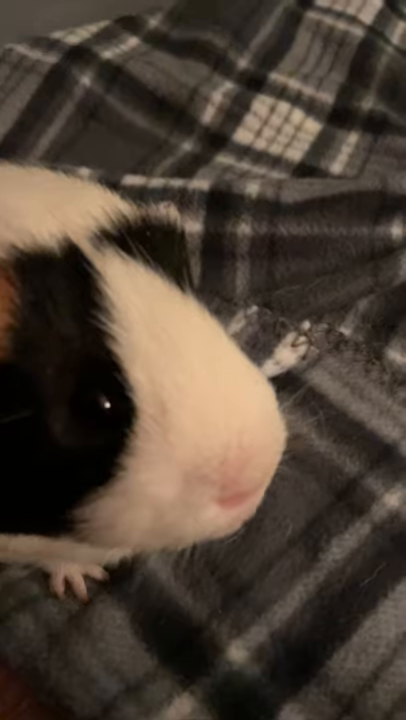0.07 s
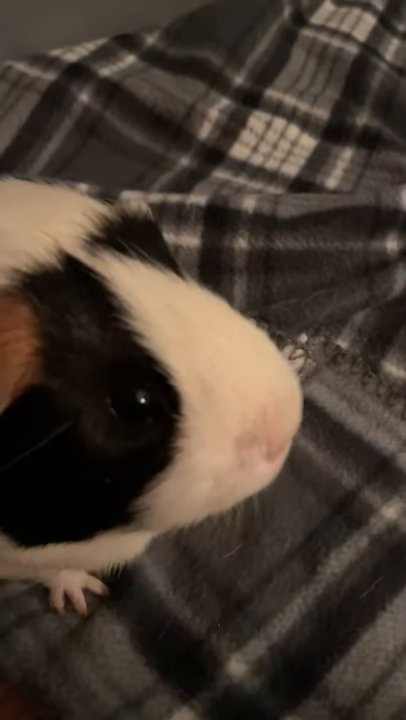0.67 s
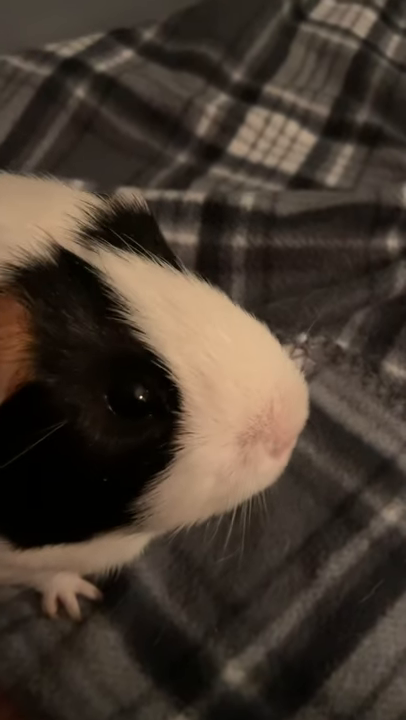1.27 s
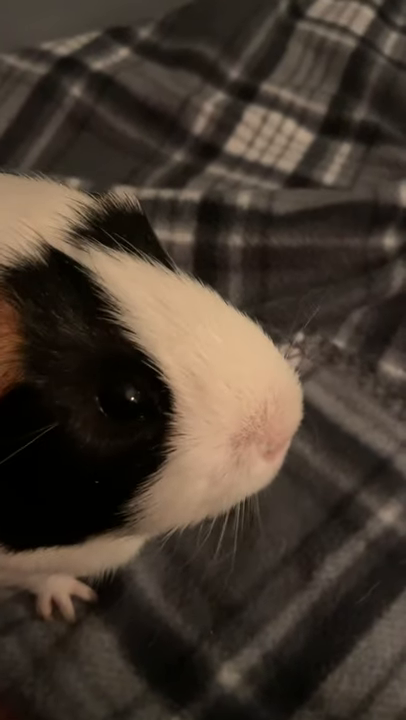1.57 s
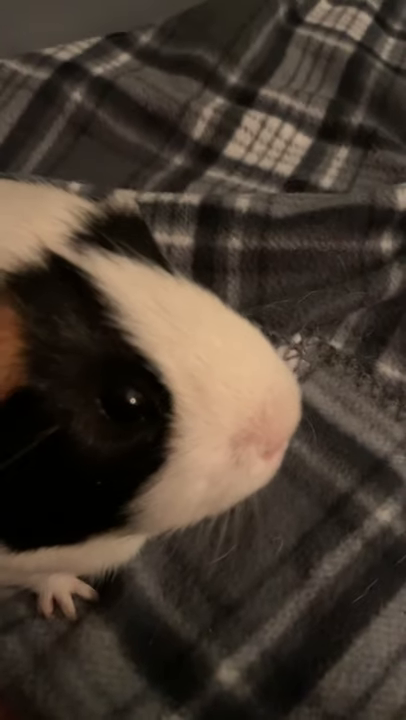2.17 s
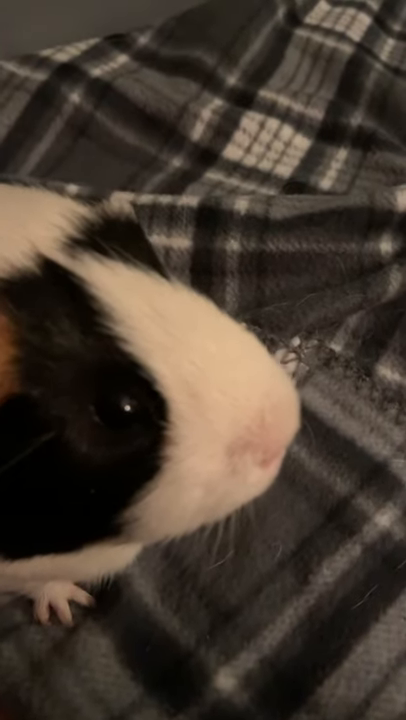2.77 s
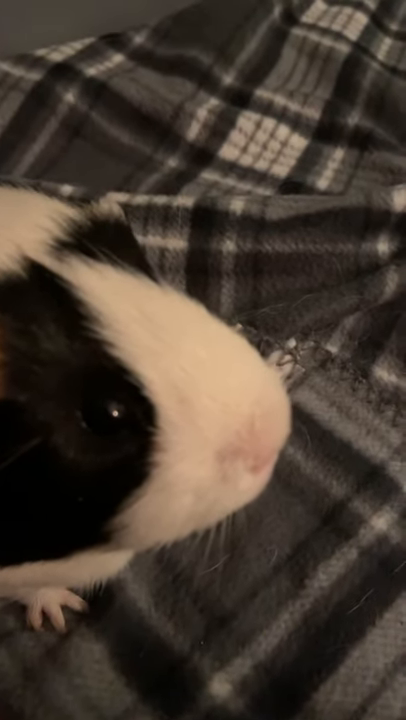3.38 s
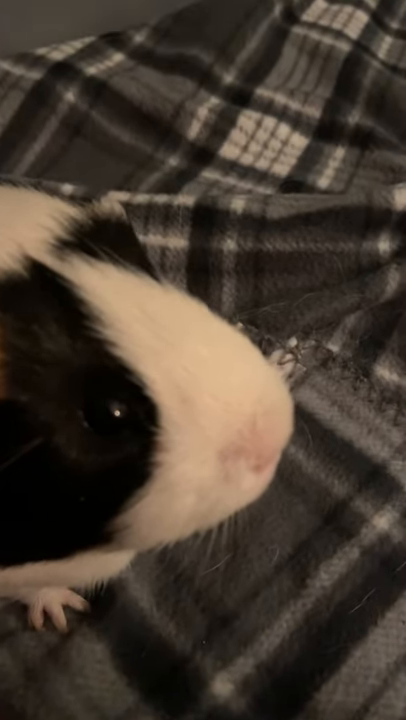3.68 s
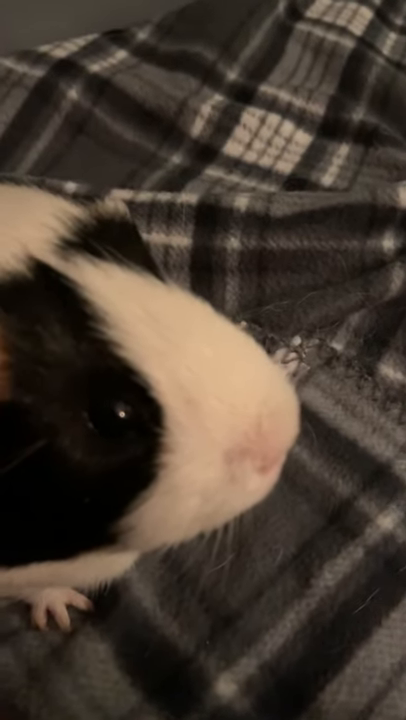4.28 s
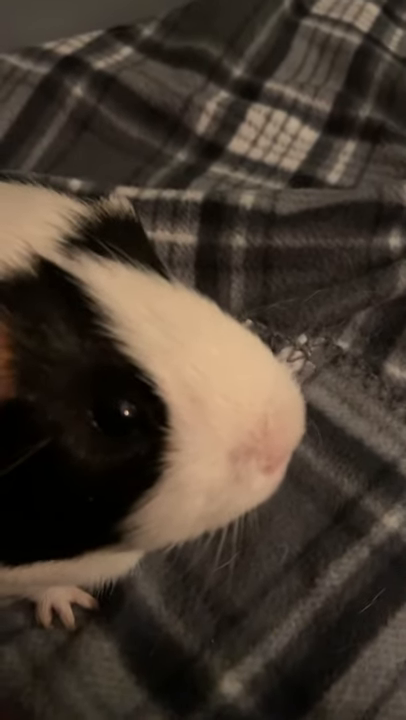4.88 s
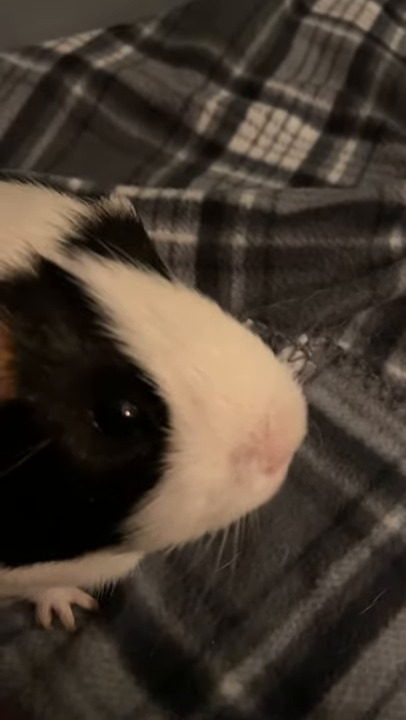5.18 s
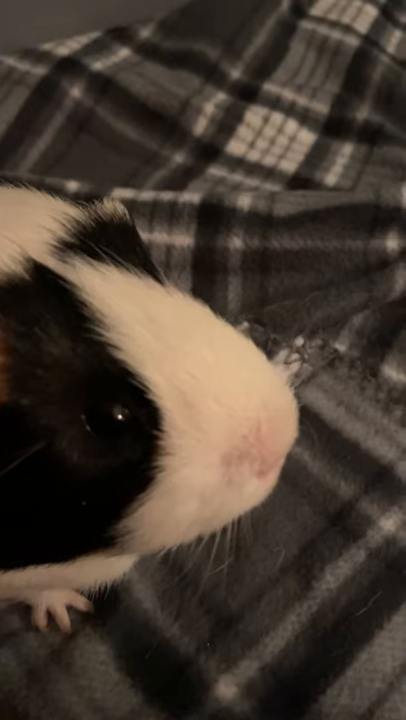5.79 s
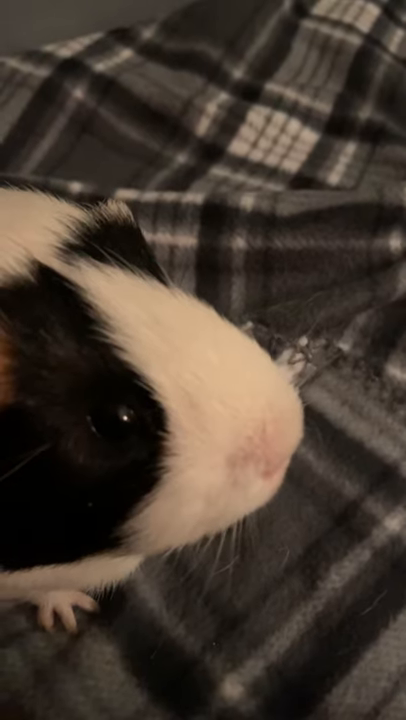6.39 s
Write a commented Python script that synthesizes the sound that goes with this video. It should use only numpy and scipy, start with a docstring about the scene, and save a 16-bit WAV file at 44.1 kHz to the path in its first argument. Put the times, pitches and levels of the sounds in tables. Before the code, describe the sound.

In a quiet indoor room with a low electrical hum and faint hiss, a guinea pig clucks softly right by the microphone. Its very short, creaky chirps come in quick pairs for about three seconds, thin out to a single call for a second, then resume, ending at their brightest and loudest. Now and then its fleece blanket shifts with a soft bump or a light scratchy rustle.

```python
"""A guinea pig makes quick "chut" calls, mostly in pairs, close to a small two-port microphone.
Each chut starts as a low, fluttering creak of the vocal folds, then breaks into a short, clean note
that arches in pitch. The throat and snout colour both parts.
Its fleece blanket gives a few soft bumps and rustles. Behind it all is a quiet room,
with mains hum, a low rumble and faint hiss."""
import sys
import numpy as np
from scipy import signal
from scipy.fft import rfft, irfft
from scipy.io import wavfile
from scipy.ndimage import uniform_filter1d

SR = 44100
rng = np.random.default_rng(int(sys.argv[2]) if len(sys.argv) > 2 else 0)


def file_out(sig):
    """Save sig as 16-bit WAV at sys.argv[1]."""
    # one column per channel
    cols = np.atleast_2d(sig).T
    # limit, then scale
    lim = np.clip(cols, -1, 1)
    pcm = np.round(lim * 32767).astype(np.int16)
    wavfile.write(sys.argv[1], SR, pcm)


N = 284445

# The calls. Each row: start in seconds, creak level in dB, flutter depth (0 none, 1 full), bursts per
# second, note start and length in seconds, the note's start, middle and end pitch in Hz, note level in dB.
CHUT_CALLS = [(0.073, -53.5, 0.73, 110, .1, 0.027, 700, 832, 890, -50),
              (0.151, -53, 0.7, 95, .174, 0.012, 760, 940, 840, -52.5),
              (0.344, -53.5, 0.31, 61, .363, 0.026, 497, 768, 960, -48),
              (0.565, -47, 0.65, 135, .603, .019, 560, 910, 850, -42),
              (0.806, -52, 1, 60, .822, 0.028, 610, 756, 750, -50.5),
              (1.003, -46.5, 1, 130, 1.025, 0.027, 830, 873, 855, -44),
              (1.081, -50, 0.56, 95, 1.104, 0.022, 580, 810.5, 720, -50.5),
              (1.247, -49, 0.75, 133, 1.294, 0.024, 900, 1035, 945, -42.5),
              (1.343, -48, 0.5, 130, 1.372, 0.028, 566, 730, 760, -50.5),
              (1.517, -49.5, 0.84, 110, 1.569, 0.016, 974.5, 1177, 1140, -41.5),
              (1.612, -47.5, 1.05, 101, 1.645, .016, 749.6, 872, 835, -46.5),
              (1.771, -46, 1.18, 123, 1.8245, 0.02, 1024, 1272, 1019, -38.5),
              (1.862, -45, .75, 144, 1.895, .02, 770, 898, 826, -42),
              (2.023, -45, 1.04, 122, 2.079, 0.024, 950, 1225, 907, -38.5),
              (2.118, -45, 0.96, 120, 2.159, 0.027, 786, 1072, 939, -39.5),
              (2.339, -50, 0.92, 104, 2.392, 0.015, 1040, 1270, 1227, -40.5),
              (2.431, -48, .95, 102, 2.4715, .022, 840, 1062, 975, -41.5),
              (2.639, -49.5, 0.88, 114, 2.6895, 0.014, 1019, 1222, 1371, -39.5),
              (2.731, -49, 0.97, 113, 2.7725, 0.026, 800, 1076, 1000, -41.5),
              (3.233, -50.5, 0.42, 134, 3.268, .023, 637, 920, 1008, -46.5),
              (3.978, -50, 0.03, 130, 4.002, .015, 690, 822, 824, -47.5),
              (4.049, -57, 0.16, 138, 4.067, 0.021, 393, 560, 536, -49.5),
              (4.238, -48.5, 0.29, 140, 4.2795, .02, 755, 896, 774, -47.5),
              (4.331, -49, 0.75, 135, 4.351, .014, 503.3, 624, 620, -47),
              (4.476, -46, 0.78, 143, 4.521, 0.017, 580, 903, 790, -44.5),
              (4.585, -52.5, 0.62, 120, 4.604, .017, 419.4, 589, 700, -47.5),
              (4.789, -48.5, 0.37, 140, 4.83, 0.01966, 656, 1051, 1161, -46.5),
              (4.883, -48, .55, 166, 4.9065, 0.029, 705, 805, 1040, -49.5),
              (5.066, -48.5, 0.83, 102, 5.116, .013, 1033, 1206, 1349, -39),
              (5.157, -46, 0.78, 125, 5.19, 0.022, 670, 1038, 1108, -40.5),
              (5.242, -47.5, 0.04, 118, 5.254, 0.017, 525, 677, 614, -47.5),
              (5.382, -48.5, 1, 81.6, 5.4295, 0.017, 923, 1247, 1437, -38.5),
              (5.474, -47, 0.96, 130, 5.5075, 0.027, 793, 1071, 950, -41),
              (5.658, -44.5, 0.78, 135, 5.717, 0.019, 1229, 1403, 1060, -37),
              (5.753, -45, 0.96, 86, 5.801, .016, 990, 1043, 980, -39.5),
              (5.93, -45.5, 0.88, 111, 5.987, 0.018, 1160, 1290, 845, -38.5),
              (6.019, -45.5, 0.87, 105, 6.0714, 0.021, 930, 1096, 940, -37),
              (6.202, -46.5, 0.84, 127, 6.2625, 0.027, 1186, 1362, 770, -35.5),
              (6.2948, -44.5, 0.83, 133, 6.3455, 0.025, 924, 1255, 840, -36.5)]
# Lone clucks of the vocal folds. Each row: start in seconds, level in dB.
LONE_CLUCKS = [(.101, -46), (.366, -45.5), (4.854, -42)]
# How the throat and snout colour the voice. Each row: frequency in Hz, boost in dB.
THROAT_COLOUR = [(120, -35), (260, -10.5), (490, 3), (680, -0.5), (1050, 3), (1300, 6), (1550, 2),
                 (1750, -8.5), (1930, -19), (2200, -8.5), (2450, -9), (2720, -8.5), (3100, -17),
                 (3550, -34.5), (4300, -38.5), (7000, -62)]
# Bumps and rustles of the blanket. Each row: start in seconds, level in dB, centre frequency in Hz,
# width in octaves, seconds to rise, seconds to fade by 60 dB.
BLANKET_MOVES = [(0.099, -69.5, 3580, 0.22, 0.0065, 2), (0.307, -43, 170, 0.11, 0.019, 0.12),
                 (1.247, -68, 3430, 0.24, 0.014, 0.67), (1.622, -71, 3800, 0.2, 0.039, 1.3),
                 (0.68, -88, 11400, 0.14, 0.055, 0.99), (1.33, -83, 7820, 0.15, 0.036, 0.53),
                 (1.58, -78, 11620, 0.08, 0.08, 0.46), (0.43, -77, 3480, 0.23, 0.04, 0.8),
                 (0.86, -72.5, 3500, 0.27, 0.05, 1.1), (3.37, -56.5, 2650, 0.34, 0.013, 0.26),
                 (3.372, -73, 5000, 0.57, 0.004, 0.08), (3.78, -71.5, 1910, 0.65, 0.018, 1.7),
                 (4.918, -42.5, 157, 0.11, 0.017, 0.16), (5.101, -75, 3838, 0.16, 0.028, 1.88),
                 (5.645, -50, 190, 0.72, 0.014, 0.84)]
# Timing of a near sound at the two ports. Each row: frequency in Hz, left's lead in radians.
LEFT_LEAD = [(300, 0), (430, -.3), (630, -2), (800, -1.4), (1350, -1.9), (1540, -2.9), (1650, -5.1),
             (1800, -6.4), (1950, -8.2), (2400, -9.1), (2750, -10), (3400, -10.2)]
# Balance of a near sound at the two ports. Each row: frequency in Hz, left minus right in dB.
LEFT_BOOST = [(180, 0), (280, 2.5), (600, -1), (700, 2.5), (850, -.6), (1400, .3), (1600, -5), (1780, 0),
              (2170, -6), (2350, -3), (2700, -6.5), (3150, 0)]
# Overtones of the mains hum. Each row: frequency in Hz, level in dB.
HUM_OVERTONES = [(119.95, -53.5), (239.9, -67.5), (359.8, -74.5)]
# Overall shape of the rumble and hiss. Each row: frequency in Hz, relative level in dB.
NOISE_COLOUR = [(20, -65), (32, -50), (45, -4.5), (75, -9), (125, -2), (200, -3), (300, -7), (470, -13.5),
                (640, -14.5), (850, -15), (1500, -24.5), (3000, -33), (4000, -38), (4800, -53.5),
                (5700, -36.5), (7400, -36.5), (9000, -52.5), (11000, -39), (13000, -48.5), (15700, -41.5)]
# Hollow resonances of the room. Each row: frequency in Hz, width in Hz, boost in dB.
ROOM_RESONANCES = [(43.8, 15, 14), (93.5, 20, 5.5), (149.4, 22.6, 7), (181.6, 8.9, 7), (2017, 190, 5),
                   (2293, 130, 6)]
# How alike the noise is at the two ports. Each row: frequency in Hz, likeness (-1 opposite, 1 the same).
NOISE_LIKENESS = [(100, .99), (180, .85), (270, .65), (450, .1), (700, -.7), (1250, -.7), (1900, -.25),
                  (3300, -.25), (6000, 0), (9000, .1), (15000, .08)]
# Slow drift of the noise. Each row: time in seconds, middle band and upper band in dB.
# Only a share of each band's swing around its usual level is used.
NOISE_DRIFT = [(0.06, -50, -68), (0.5, -64, -74.5), (0.92, -58, -72), (1.2, -61, -72.5), (1.45, -56, -72),
               (1.72, -47, -67.5), (2.05, -60, -76), (2.3, -65, -77.5), (2.6, -68, -74.5),
               (2.87, -101, -82), (3.3, -77, -78.5), (3.7, -85.5, -81), (4.17, -71, -80),
               (4.52, -61.5, -81), (4.86, -72.5, -82), (5.32, -57.5, -73), (5.66, -70, -75),
               (5.88, -59, -77.5), (6.21, -61, -79.5), (6.3, -56, -67), (6.44, -70, -79)]
# The treble hiss sinks a little. Each row: time in seconds, relative level in dB.
TREBLE_SINK = [(0, -2.5), (1.8, -3.5), (3.6, -4.5), (6.45, -5)]
# The moving edge below which the sound is mono. Each row: time in seconds, frequency in Hz.
MONO_BELOW = [(0, 910), (1.3, 850), (1.95, 500), (2.4, 252), (3.6, 154.8), (4.7, 155), (5.3, 281.5),
              (6.45, 308)]


def guinea_pig(pause_s=.0035, pair_gap_s=.04, cluck_hz=560, cluck_s=.0013):
    """Each chut is a creak and then a note through the same throat; a cluck is one lone burst."""
    voice, last_end = np.zeros(N), 0
    for s, creak_db, depth, rate, note_s, length, start_hz, middle_hz, end_hz, note_db in CHUT_CALLS:
        throat = open_throat(note_db, usual_db=-52, opening=.86)
        # The folds pause as they switch from creak to note, longer after a deep flutter.
        creak_length = max(note_s - s - pause_s * depth, .004)
        # The second chut of a pair starts with the breath already pushing, so it swells less.
        second_of_pair = s - last_end < pair_gap_s
        swell_db = 5.5 - 5 * depth * second_of_pair
        add(voice, s, gain_of(creak_db) * creak(creak_length, rate, depth, throat, swell_db))
        add(voice, note_s, gain_of(note_db) * note(length, start_hz, middle_hz, end_hz, throat))
        add(voice, note_s, breath(length, note_db))
        last_end = note_s + length
    for s, level_db in LONE_CLUCKS:
        cluck = burst(cluck_hz, open_throat(level_db, usual_db=-44))
        add(voice, s, gain_of(level_db) * np.sqrt(cluck_s * SR) * cluck)
    return voice


def creak(length, rate, depth, throat, swell_db, from_hz=440, to_hz=660, jitter=.08, uneven_db=1.1):
    """A low, rising buzz that a slower flutter breaks into bursts; it brightens as it swells."""
    size, depth = int(length * SR), np.clip(depth, 0, 1)
    progress = np.linspace(0, 1, size)
    # Deeper flutter makes the buzz lower, rougher and breathier.
    hz = from_hz * (to_hz / from_hz) ** progress * np.exp(-.1286 * depth)
    wobble = np.exp((.04 + .183 * depth) * wavering(size, smooth=50))
    air = .29 * depth * wavering(size, smooth=5)
    swell = gain_of(swell_db * progress)
    bright_db = 1.06 * swell_db * (progress - .5)
    buzz = unit_level(vocal_folds(hz * wobble, slope_db=bright_db - 4))
    steady = signal.fftconvolve(signal.windows.tukey(size, .3) * swell * (buzz + air), throat)
    bursts = np.zeros(len(steady))
    for start, (late, loud) in zip(np.arange(0, length - .003, 1 / rate), rng.standard_normal((16, 2))):
        at = int(start * SR)
        flap = swell[at] * gain_of(uneven_db * loud) * burst(hz[at], throat, bright_db[at])
        add(bursts, start + jitter * late * min(start, 1 / rate), flap)
    sound = (1 - depth) * unit_level(steady) + depth * unit_level(bursts)
    return sound * np.sqrt(size / np.sum(sound ** 2))


def burst(hz, throat, bright_db=0, length=.0059, rough=.19, airflow=.25):
    """One flap of the slack folds: a few uneven pulses and a puff of air."""
    size = int(length * SR)
    wobble = np.exp(rough * wavering(size, smooth=50))
    buzz = unit_level(vocal_folds(hz * wobble, slope_db=bright_db - 2))
    air = .3 * gain_of(bright_db) * wavering(size, smooth=5)
    swell = np.sqrt(abs(np.sin(np.pi * np.linspace(0, 1, size) ** .56)))
    sound = signal.fftconvolve(swell * (buzz + airflow + air), throat)
    return sound / np.linalg.norm(sound)


def note(length, start_hz, middle_hz, end_hz, throat, tremble=.02, air=.097, pop_s=.0019):
    """The voice cracks with a tiny pop, then arches in pitch and dulls as the push of breath runs out."""
    size = int(length * SR)
    progress = np.linspace(0, 1, size)
    arch = np.polyval(np.polyfit([0, .5, 1], [start_hz, middle_hz, end_hz], 2), progress)
    crack = .084 * np.exp(-progress / .13) * 900 / middle_hz
    hz = arch * (1 + (tremble + crack) * wavering(size, smooth=50))
    # A note that starts near its pitch peaks early and fades; one that scoops up swells late and holds.
    scoop = max(.81 - start_hz / middle_hz, 0)
    skew, fade_db = .59 + 2.3 * scoop, min(-2.5 + 26 * scoop, 0)
    shimmer = 1 + .15 * wavering(size, smooth=110)
    swell = abs(np.sin(np.pi * progress ** skew)) ** .55 * gain_of(fade_db * progress) * shimmer
    pop = .6 * np.exp(-progress * length / pop_s)
    puff = (air * swell + pop) * wavering(size, smooth=12) * 1000 / middle_hz
    tone = vocal_folds(hz, slope_db=-2.5 - 7 * progress, count=2)
    sound = signal.fftconvolve(swell * tone + puff, throat)
    return sound * np.sqrt(size / np.sum(sound ** 2))


def vocal_folds(hz, slope_db, count=6):
    """The folds pulse at the given pitch; their overtones change by slope_db with each octave."""
    turns = np.cumsum(hz) / SR
    return sum(gain_of(slope_db * np.log2(k)) * np.cos(2 * np.pi * k * turns)
               for k in range(1, count + 1))


def open_throat(level_db, usual_db, opening=1.0, size=2048):
    """The throat as a filter: the harder the call, the wider the mouth and the more treble gets out."""
    hz, colour_db = np.transpose(THROAT_COLOUR)
    treble_db = opening * (level_db - usual_db) * curve_at([(1150, .27), (2700, .81)], hz)
    colour = np.transpose([hz, colour_db + treble_db])
    log_gain = np.log(gain_of(curve_at(colour, abs(np.fft.fftfreq(size, 1 / SR)))))
    # Turn the colour into a short ring that starts at once (a minimum-phase filter).
    return np.fft.ifft(np.exp(np.conj(signal.hilbert(log_gain)))).real[:size // 2]


def breath(length, note_db, air_db=-81, hard_note_db=-36):
    """A thin hiss of air rides on each note, strongest on the hardest ones."""
    size = int(length * SR)
    hiss = unit_level(low_cut(rng.standard_normal(SR // 8), hz=3600, order=2))[:size]
    swell = unit_level(signal.windows.hann(size))
    return gain_of(air_db + 1.2 * (note_db - hard_note_db)) * swell * hiss


def blanket(scratch_db=3, scratchy_above_hz=1000):
    """Fleece shifts under the paws: dull bumps, and scratchy rustles where fibres catch and slip."""
    out, t, hz = np.zeros(N), np.arange(SR) / SR, np.fft.rfftfreq(SR, 1 / SR)
    for s, level_db, centre_hz, octaves, rise_s, fade_s in BLANKET_MOVES:
        band = np.exp(-.5 * (np.log2((hz + 1) / centre_hz) / octaves) ** 2)
        fibres, catches = rng.standard_normal((2, len(t)))
        if centre_hz > scratchy_above_hz:
            fibres *= gain_of(scratch_db * unit_level(uniform_filter1d(catches, size=90)))
        rustle = unit_level(irfft(rfft(fibres) * band))
        fade_db = -60 * np.maximum(t - rise_s, 0) / fade_s
        add(out, s, rustle * np.minimum(t / rise_s, 1) * gain_of(level_db + fade_db))
    return out


def room_echo(x, near_db=-21, near_fade_s=.06, tail_db=-27, tail_fade_s=.25):
    """Sound bounces weakly off things nearby, then dies away in the furnished room."""
    t = np.arange(SR // 2) / SR
    near, tail = rng.standard_normal((2, 2, len(t))) * (t > .002)
    near = gain_of(near_db) * unit_level(near * gain_of(-60 * t / near_fade_s))
    tail = gain_of(tail_db) * unit_level(tail * gain_of(-60 * t / tail_fade_s))
    return signal.fftconvolve(x[None], (near + tail) / np.sqrt(len(t)), axes=1)[:, :N]


def hum(mains_hz=60, mains_db=-56.5, motor_hz=59.04, motor_db=-61, in_step_s=1.58):
    """Mains hum; a motor turning just under mains speed makes it throb about once a second."""
    t = np.arange(N) / SR
    mains = gain_of(mains_db) * np.cos(2 * np.pi * mains_hz * (t - in_step_s))
    motor = gain_of(motor_db) * np.cos(2 * np.pi * motor_hz * (t - in_step_s))
    overtones = sum(gain_of(db) * np.sin(2 * np.pi * (hz * t + rng.random())) for hz, db in HUM_OVERTONES)
    sway = np.interp(t, np.linspace(0, t[-1], 30), rng.standard_normal(30))
    return np.sqrt(2) * (mains + motor + overtones * (1 + .15 * sway))


def room_noise(level_db=-52, patchy_db=3.5):
    """Low rumble and faint, patchy hiss, coloured by the room's resonances."""
    t = np.arange(N // 1024 + 5) * 1024 / SR
    hz = np.fft.rfftfreq(4096, 1 / SR)
    left_re, left_im, other_re, other_im, patches = rng.standard_normal((5, len(t), len(hz)))
    left, other = left_re + 1j * left_im, other_re + 1j * other_im
    likeness = curve_at(NOISE_LIKENESS, hz)
    right = likeness * left + np.sqrt(1 - likeness ** 2) * other
    peaks_db = sum(db / (1 + (2 * (hz - centre) / width) ** 2) for centre, width, db in ROOM_RESONANCES)
    colour_db = curve_at(NOISE_COLOUR, hz) + peaks_db
    patches = unit_level(uniform_filter1d(uniform_filter1d(patches, size=4, axis=0), size=30, axis=1))
    # The top hiss is smoother than the rustling band below it.
    flicker_db = patchy_db * patches * curve_at([(300, .66), (900, 1.16), (3000, 1.26), (6000, .68)], hz)
    spectra = np.array([left, right]) * gain_of(colour_db + noise_drift_db(t, hz) + flicker_db)
    _, noise = signal.istft(spectra.swapaxes(1, 2), nperseg=4096, noverlap=3072)
    return gain_of(level_db) * unit_level(noise[:, :N])


def noise_drift_db(t, hz, middle_share=.42, upper_share=.94):
    """The middle and upper bands of the noise slowly rise and fall, and the treble sinks a little."""
    times, *bands = np.transpose(NOISE_DRIFT)
    middle, upper = [np.interp(t, times, db - np.median(db)) for db in bands]
    treble = np.interp(t, *np.transpose(TREBLE_SINK))
    middle_band = middle_share * curve_at([(200, 0), (450, .52), (1000, .68), (2000, .0014)], hz)
    upper_band = upper_share * curve_at([(1000, .12), (2000, .85), (3000, .77), (5500, .025)], hz)
    treble_band = curve_at([(3000, .011), (5500, .98)], hz)
    return np.outer(middle, middle_band) + np.outer(upper, upper_band) + np.outer(treble, treble_band)


def microphone_ports(x):
    """A near sound reaches the microphone's two openings with different timing and level."""
    hz = np.fft.rfftfreq(2 * N, 1 / SR)
    left = gain_of(curve_at(LEFT_BOOST, hz) / 2) * np.exp(.5j * curve_at(LEFT_LEAD, hz))
    return irfft(rfft(x, 2 * N) * np.array([left, 1 / left]))[:, :N]


def mono_bass(x):
    """Below a slowly moving edge, both channels carry the left port alone."""
    hz, t, (left, right) = signal.stft(x, SR, nperseg=1024)
    edge_hz = np.interp(t, *np.transpose(MONO_BELOW))
    share = 1 / (1 + (hz[:, None] / edge_hz) ** 8)
    return signal.istft(np.array([left, right + share * (left - right)]), SR, nperseg=1024)[1][:, :N]


def gain_of(db):
    """Turns decibels into a multiplier."""
    return 10 ** (np.asarray(db) / 20)


def unit_level(x):
    """Scales a signal to an average (rms) level of 1."""
    return x / np.sqrt(np.mean(x ** 2) + 1e-20)


def curve_at(points, hz):
    """Reads between (Hz, value) points, with octaves evenly spaced."""
    point_hz, value = np.transpose(points)
    return np.interp(np.log(hz + 1), np.log(point_hz + 1), value)


def wavering(size, smooth):
    """A random wiggle; a larger smooth makes it slower."""
    return unit_level(uniform_filter1d(rng.standard_normal(SR // 8), size=smooth))[:size]


def low_cut(x, hz, order=4):
    """Removes the bass below hz."""
    return signal.sosfilt(signal.butter(order, hz, "highpass", fs=SR, output="sos"), x)


def add(mix, s, sound):
    """Mixes a sound in, starting at s seconds."""
    part = mix[max(round(s * SR), 0):][:len(sound)]
    part += sound[:len(part)]


def scene():
    """The guinea pig on its blanket, in the humming room."""
    voice = guinea_pig()
    return microphone_ports(voice + blanket()) + room_echo(low_cut(voice, hz=310)) + hum() + room_noise()


def record(dry):
    """The microphone opens after a moment, makes the bass mono and cuts the very lows and highs."""
    opened = np.clip((np.arange(N) / SR - .033) / .004, 0, 1)
    heard = low_cut(mono_bass(dry) * opened, hz=36.5, order=6)
    high_cut = signal.firwin(511, cutoff=15750, window=("kaiser", 9), fs=SR)
    return signal.oaconvolve(heard, high_cut[None], "same")


dry = scene()
out = record(dry)
file_out(out)
```